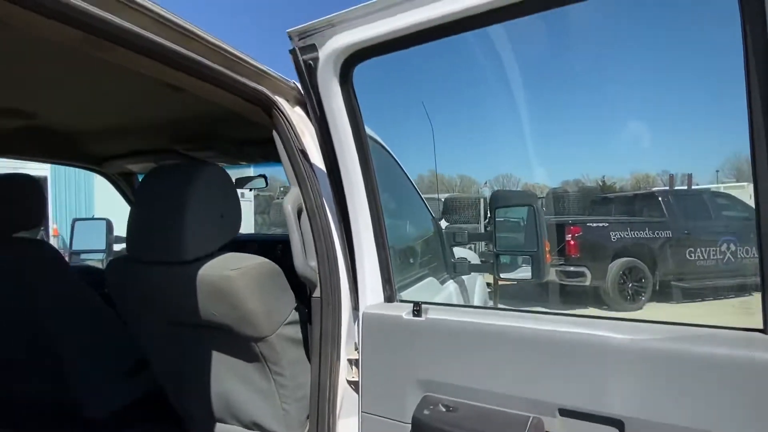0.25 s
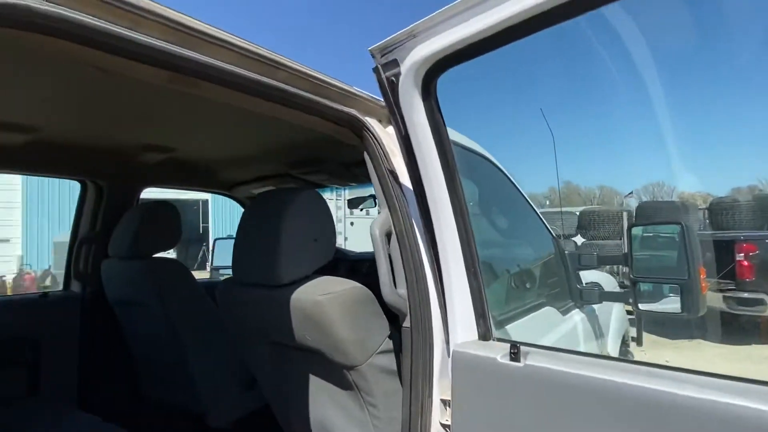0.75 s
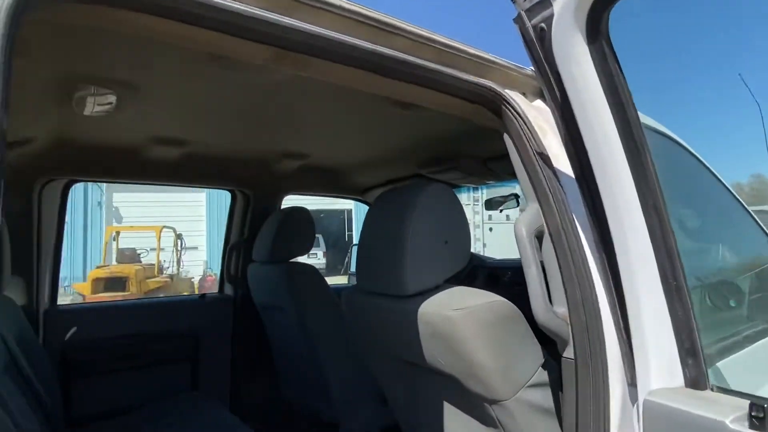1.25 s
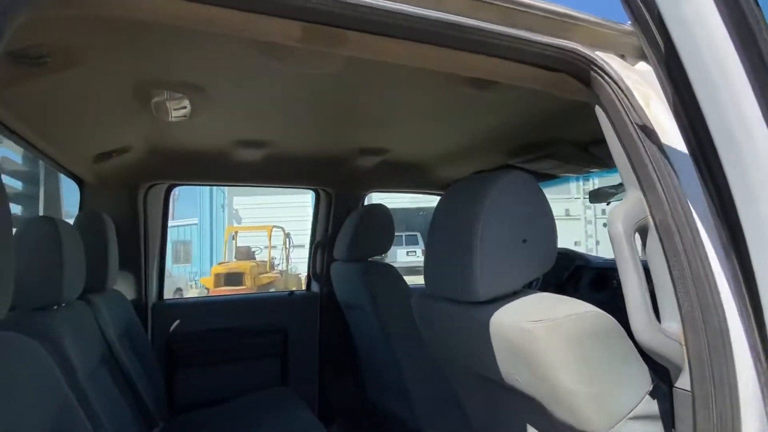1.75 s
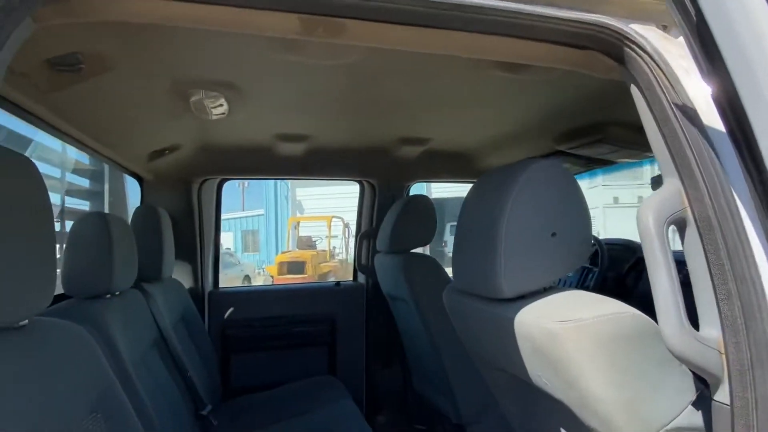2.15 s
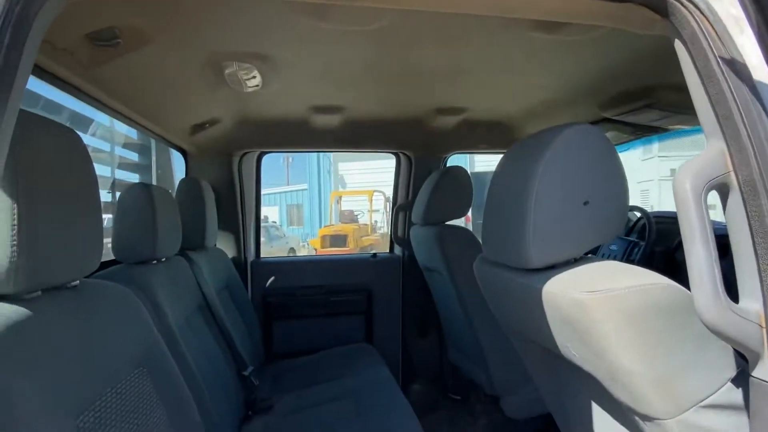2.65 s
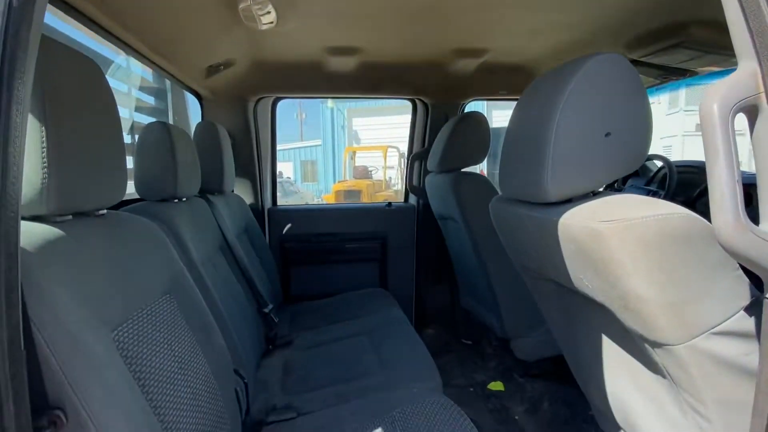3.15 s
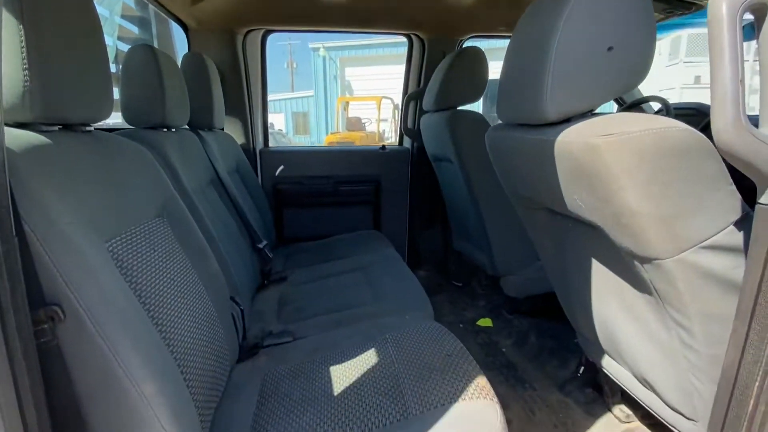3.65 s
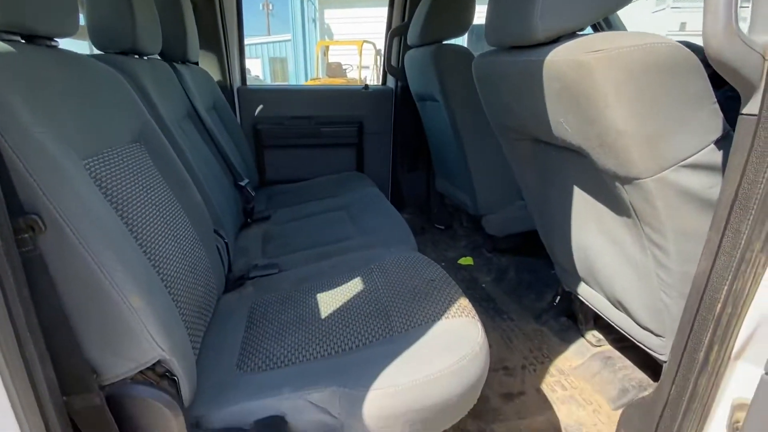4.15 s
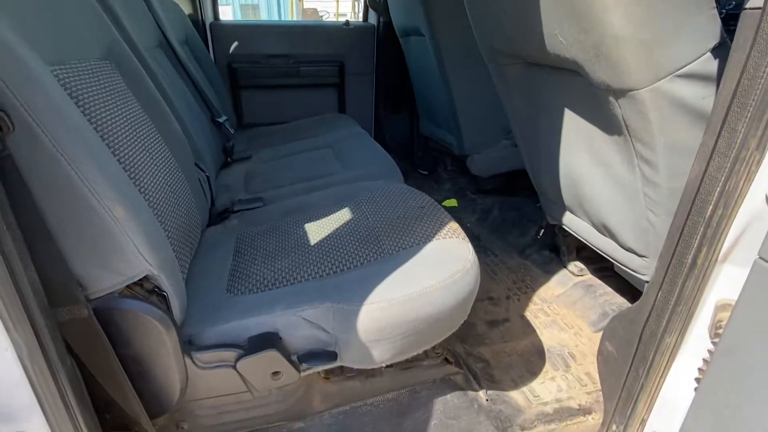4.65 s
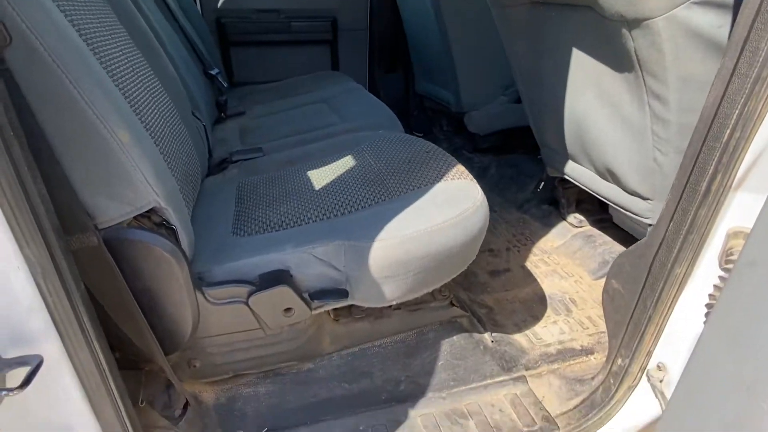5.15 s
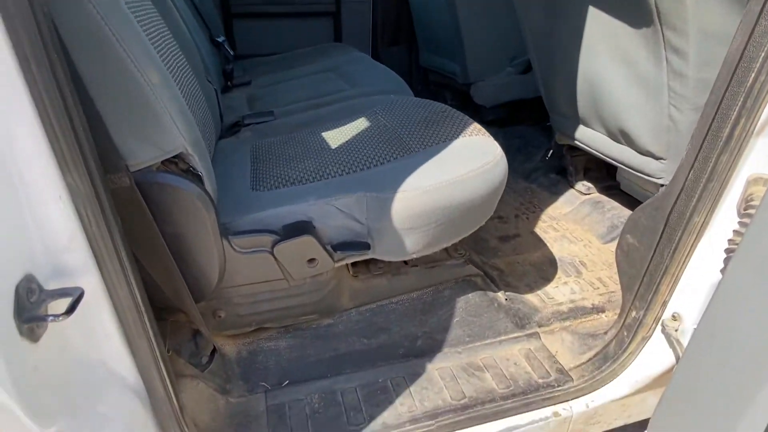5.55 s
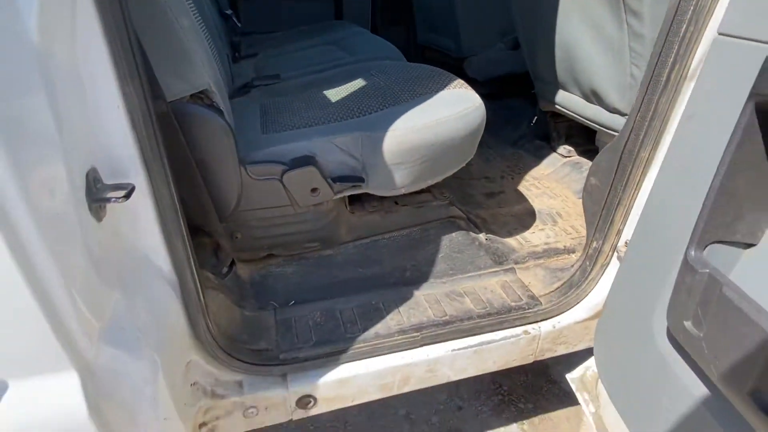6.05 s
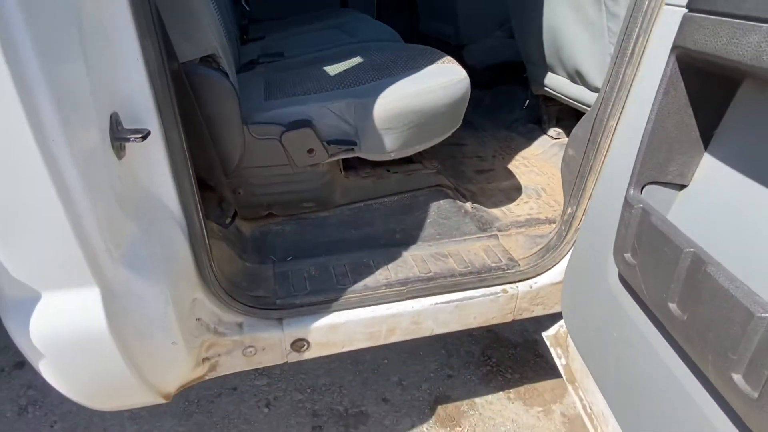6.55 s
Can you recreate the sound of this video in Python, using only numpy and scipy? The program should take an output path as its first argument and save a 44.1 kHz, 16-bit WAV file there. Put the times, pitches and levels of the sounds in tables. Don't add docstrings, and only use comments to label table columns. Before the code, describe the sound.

A six-cylinder diesel pickup idles throughout in an open yard, about forty uneven firings a second blending into a lumpy low hum, with mid-range block rumble and soft injector clatter. A hand-held stereo microphone moves past the open rear door, so the boom swells and thins. From 0 to 2 seconds wind buffets it, with slaps near 1.0 and 1.3 and a heavy thump at 1.6. Faint cloth hiss slides on the right around 1.1-1.8. Stones knock sharply at 1.5, and grit crackles at 1.8-2.0. Small bright ticks come on the left at 2.6 and, softer, 3.45. Hollow fan air sings from about 3 to 5, strongest near 4.1, sinking in pitch. Wind slaps return at 4.5-4.9, hardest at 4.8, with lighter gusts near 5.7. Gritty steps crunch at 5.65 and 6.1, then a heel clacks at 6.5 as the idle continues.

```python
import sys
import numpy as np
from scipy import signal
from scipy.fft import rfft, irfft, next_fast_len
from scipy.io import wavfile
from scipy.ndimage import uniform_filter1d, map_coordinates

SR = 44100
rng = np.random.default_rng(int(sys.argv[2]) if len(sys.argv) > 2 else 0)


def boost(x):
    u = np.asarray(x, float) / 20
    return 10 ** u


def log_audio(samples):
    frames = np.atleast_2d(samples).T
    limited = np.clip(frames, -1, 1)
    pcm = np.round(limited * 32767).astype(np.int16)
    wavfile.write(sys.argv[1], SR, pcm)


N = 300321
TIME = np.arange(N) / SR
PORT_LAG = 22


def curve(table):
    s, *columns = np.transpose(table)
    return [np.interp(TIME, s, c) for c in columns]


def unit(x):
    return x / np.sqrt(np.mean(x ** 2))


def colour(x, points):
    size = next_fast_len(N)
    hz, db = np.transpose(points)
    bins = np.log(np.arange(size // 2 + 1) * SR / size + 1)
    gain = boost(np.interp(bins, np.log(hz), db, -90, -90))
    return unit(irfft(rfft(x, size) * gain, size)[..., :N])


def ring(x, modes):
    out = 0
    for k, (hz, width_hz, db) in enumerate(modes):
        peak = signal.iirpeak(hz, hz / width_hz, SR)
        out = out + (-1) ** k * boost(db) * signal.lfilter(*peak, x)
    return unit(out)


def steep(x, order, hz, kind):
    return signal.sosfiltfilt(signal.butter(order, hz, kind, fs=SR, output="sos"), x)


def walk(rate_hz):
    k = int(SR / rate_hz)
    held = np.repeat(rng.standard_normal(N // k + 1), k)
    return unit(uniform_filter1d(uniform_filter1d(held, k), k)[:N])


def bumps(rows):
    fade_db = 10
    power = 0
    for s, db, width_s in rows:
        power = power + boost(db - fade_db * np.abs(TIME - s) / max(width_s, .01)) ** 2
    return np.sqrt(power)


def pan(x, db, lag=0):
    return np.array([x * boost(db / 2), np.roll(x, lag) * boost(-db / 2)])


def port_gain(db, pan_db):
    return boost(db + np.array([[pan_db], [-pan_db]]) / 2)


def bend(x, share):
    at = np.arange(N) + np.cumsum(share)
    read = [map_coordinates(v, [at], order=1, mode="mirror") for v in np.atleast_2d(x)]
    return np.array(read).reshape(x.shape)


def waver(x):
    drift = walk(7)
    return bend(x, .017 * (drift - drift.mean()))


def spread(points, likeness):
    direct = pan(rng.standard_normal(N), 0, PORT_LAG)
    scattered = rng.standard_normal((2, N))
    return colour(np.sqrt(likeness) * direct + np.sqrt(1 - likeness) * scattered, points)


CYLINDER_DB = [3.5, -2, -18.5, 1.5, 1.5, -13]


def firings():
    firing_hz, jitter, scatter_db, roughness = 41.4, .0322, 1.5, 2.6
    count = int(N / SR * 50)
    timing, strength = rng.standard_normal((2, count))
    at = ((np.arange(count) + jitter * np.cumsum(timing)) * SR / firing_hz).astype(int)
    size = boost(np.resize(CYLINDER_DB, count) + scatter_db * strength)
    inside = (at >= 0) & (at < N)
    pulses = np.zeros(N)
    pulses[at[inside]] = size[inside]
    return pulses, unit(pulses) + roughness * rng.standard_normal(N)


# time in seconds, cab boom in dB, exhaust above it in dB.
BOOM = [(0.0, -31.5, 1), (1.01, -29, -4.5), (1.61, -35, 7), (1.63, -27.5, -7.5), (2.1, -43.5, 4),
        (2.65, -26, -25), (2.69, -35.5, -2), (2.77, -22, -19), (3.13, -27.5, -4), (4.72, -28, -0.5),
        (4.89, -30, -1.5), (4.95, -24.5, -9), (5.03, -26.5, 1), (5.08, -31.5, -10), (5.5, -26, -11.5),
        (6.35, -41, 1.5), (6.71, -27.5, -9.5), (6.81, -31, -16)]
# frequency in Hz, width in Hz, level in dB.
CAB_MODES = [(113.4, 14.5, -3), (165.35, 13.4, -0.5), (205.9, 12, -5.5)]
# frequency in Hz, width in Hz, level in dB.
PIPE_MODES = [(61.9, 19.6, -0.5), (82.7, 9.7, 0), (103.7, 8.7, 3)]


def boom(gas):
    cab_db, pipe_above_db = curve(BOOM)
    pan_db = -3.5 + 4 * walk(8.9)
    cab = ring(ring(gas, CAB_MODES), [(157.5, 116, 0)])
    pipe = ring(ring(gas, PIPE_MODES), [(77.0, 210, 0)])
    return pan(boost(cab_db) * cab, pan_db) + boost(cab_db + pipe_above_db) * pipe


# delay in ms, sway in ms, sway rate in Hz, level in dB.
MIRRORS = [(2.3, .5, .37, -13), (4.1, .7, .53, -11), (7.3, .9, .45, -11), (12.7, 1.2, .71, -12)]


def mirrored(x):
    out = x.copy()
    for k, (ms, sway_ms, rate_hz, db) in enumerate(MIRRORS):
        for port in range(2):
            phase = 2 * np.pi * rate_hz * TIME + 2 * k + port / 8
            lag = (ms + sway_ms * np.sin(phase)) * SR / 1000
            out[port] += boost(db) * map_coordinates(x[port], [np.arange(N) - lag], order=3, mode="mirror")
    return unit(out) * np.sqrt(np.mean(x ** 2))


# time in seconds, block rumble in dB, floor pan above it in dB,
# open-air treble in dB, valve cover above the rumble in dB.
BLOCK = [(0, -44.5, 3.5, 0, 4), (.8, -44.5, 5, 0, 3.5), (1.5, -44.5, -3, 2, -0.5),
         (2.1, -45.5, -6.5, -3, 0.5), (2.6, -45.5, -6.5, -3.5, 1), (3.5, -43.5, -7, -3, -2),
         (4.4, -44, -7.5, -1.8, 0), (5.4, -43.5, 1.5, 0.5, -1.5), (5.75, -43, 8, -0.5, -1.5),
         (6.2, -43, 0.5, 0, 2.5), (6.81, -42.5, 6.5, -0.5, -0.5)]
# frequency in Hz, level in dB.
RUMBLE = [(300, -13), (400, -11), (600, -7.5), (720, -9), (840, -3), (890, -9.5), (960, -2), (1050, -9),
          (1240, -10), (1800, -22), (2600, -55.5)]
# frequency in Hz, level in dB.
CLATTER = [(1500, -8.5), (2450, 1), (3100, -0.5), (4000, -10), (4700, -3), (5300, -8.5), (6300, -8),
           (9000, -13.5), (16000, -10)]
# frequency in Hz, width in Hz, level in dB.
MANIFOLD_MODES = [(958, 23, 1.5), (1238, 52, -6.5), (2460, 63, -20)]


def block(pulses, gas):
    rumble_db, floor_db, treble_db, cover_db = curve(BLOCK)
    floor = ring(gas, [(233.0, 68, -4.0), (287.0, 51.5, 1.5), (321.0, 83, -4.5)])
    floor = pan(ring(floor, [(284, 1300, 0)]) * boost(floor_db + 2.1 * walk(18)), 1.0)
    rumble = spread(RUMBLE, .75) * boost(3 + 1.8 * walk(9))
    cover = steep(rumble, 2, [720, 1480], "band")
    rumble = rumble + (boost(cover_db) - 1) * cover
    clatter = spread(CLATTER, .66) * boost(-4 + .9 * walk(12))
    treble = steep(clatter, 2, 7000, "high")
    clatter = clatter + (boost(treble_db) - 1) * treble
    manifold = waver(ring(gas, MANIFOLD_MODES)) * boost(-14 + 1.3 * walk(5.9))
    decay_s, throb_depth = .004, .06
    swell = signal.lfilter([1], [1, -np.exp(-1 / (decay_s * SR))], pulses)
    throb = unit(1 + throb_depth * unit(swell))
    return boost(rumble_db) * (floor + manifold + throb * mirrored(rumble + clatter))


def engine():
    pulses, gas = firings()
    return boom(gas) + block(pulses, gas)


# time in seconds, buffet peak in dB, width in seconds, flutter above buffet in dB.
WIND = [(.08, -27, 0.089, -24), (.3, -31, .15, -32), (.469, -25.5, 0.067, -11), (.614, -27.5, 0.16, -18),
        (.97, -27, 0.064, -22), (1.03, -29.5, 0.018, -6), (1.27, -19, 0.027, -12), (1.4, -29, 0.17, -26),
        (1.492, -26.5, 0.11, -4.5), (1.58, -9, 0.019, -19), (1.66, -22, 0.013, -7.5),
        (1.731, -26, 0.023, -24), (1.857, -28.5, 0.073, -5), (2.005, -29.5, 0.21, -5.5),
        (2.135, -30, 0.019, 0), (2.215, -43, 0.044, -13), (2.385, -39, 0.046, -8),
        (2.639, -29.5, 0.04, -21), (3.97, -38.5, 0.58, 1.5), (4.225, -23, 0.035, -16), (4.54, -32, 0.16, 2),
        (4.699, -24, 0.12, -7), (4.789, -19.5, 0.077, -10.5), (4.93, -21.5, 0.081, -6),
        (5.637, -27, 0.062, -10), (5.73, -26.5, 0.14, -9), (5.93, -27, 0.017, -8),
        (6.006, -30.5, 0.14, -15), (6.57, -36.5, 0.19, -5)]
# frequency in Hz, level in dB.
BUFFET = [(25, -19.5), (48, 10), (86, 1), (200, -4), (300, -24.5)]
# frequency in Hz, level in dB.
FLUTTER = [(170, 2), (250, -5.5), (450, -12), (600, -36), (900, -15.5), (1500, -46)]
# time in seconds, peak in dB, frequency in Hz, cycles.
SLAPS = [
    (1.025, -15, 110, 1.5),
    (1.265, -14, 120, 1.5),
    (4.535, -18, 130, 1.5),
    (4.778, -9.5, 96, 1.6),
]


def wind():
    left_db, gusty_db, calm_buffet_db, calm_flutter_db = 1.8, 3.5, -53, -49
    big_gusts = [(s, db, width_s) for s, db, width_s, _ in WIND]
    fine_gusts = [(s, db + above_db, width_s) for s, db, width_s, above_db in WIND]
    big = np.hypot(bumps(big_gusts), boost(calm_buffet_db))
    fine = np.hypot(bumps(fine_gusts), boost(calm_flutter_db))
    buffet = colour(rng.standard_normal(N), BUFFET)
    buffet /= np.sqrt(uniform_filter1d(buffet ** 2, size=SR // 16) + 0.069)
    small = 0.5 * rng.standard_normal(N) + 1.23 * rng.standard_normal((2, N))
    flutter = colour(small, FLUTTER) * boost(gusty_db * walk(45))
    eddies = big * buffet + fine * flutter
    for s, db, hz, cycles in SLAPS:
        i, n = int(s * SR), int(cycles / hz * SR)
        swing = np.sin(2 * np.pi * hz * (TIME[:n] - TIME[n // 2]))
        eddies[:, i:i + n] += boost(db) * np.hanning(n) * swing
    return eddies * np.array([[boost(left_db)], [-boost(-left_db)]])


# time in seconds, peak in dB, frequency in Hz, cycles.
PUFFS = [(1.986, -24.5, 460, 4.5), (2.115, -32, 340, 2.5), (4.735, -26, 520, 7), (4.786, -29, 420, 2.5),
         (5.224, -29.5, 540, 6), (5.71, -24.5, 340, 2.5), (5.762, -26, 330, 4), (5.905, -26.5, 420, 3.5),
         (5.928, -26, 310, 4)]


def puffs():
    out = np.zeros(N)
    for s, db, hz, cycles in PUFFS:
        i, n = int(s * SR), int(cycles / hz * SR)
        out[i:i + n] += boost(db) * np.hanning(n) * np.sin(2 * np.pi * hz * TIME[:n])
    return pan(out, 4)


# time in seconds, aim in dB.
DUCT = [(2.3, -60), (2.85, -15), (3.5, -10), (3.68, -6), (3.76, -2.5), (4.1, -.5), (4.36, -1.5), (4.45, -8),
        (5.3, -13), (5.7, -60)]
# frequency in Hz, width in Hz, level in dB.
DUCT_MODES = [(820, 45, -4), (925, 45, 0), (1265, 60, 0), (1600, 100, -9), (2080, 50, -8)]
# frequency in Hz, width in Hz, level in dB.
MOAN_MODES = [(435, 30, 0), (500, 45, -1.5)]
# frequency in Hz, width in Hz, level in dB.
WHISTLE_MODES = [(930, 55, 0), (1250, 70, -7), (1590, 90, -12), (2090, 50, -9)]
# time in seconds, peak in dB, width in seconds.
FLARES = [
    (5.0, -34.5, 0.063),
    (5.25, -42, 0.19),
]


def duct():
    aim_db = curve(DUCT)[0]
    sag = np.clip(.1 * (4.1 - TIME), -.07, .07)
    flutter = boost(1.2 * walk(14))

    moan_gain = np.hypot(boost(-37 + 1.26 * aim_db), bumps(FLARES))
    moan = waver(ring(ring(rng.standard_normal(N), MOAN_MODES), [(437, 300, 0)]))
    moan = pan(moan * moan_gain, 4.6, PORT_LAG // 2)

    air = .9 * pan(rng.standard_normal(N), 0, 25) + .45 * rng.standard_normal((2, N))
    roar = bend(ring(ring(air, DUCT_MODES), [(1200, 3100, 0)]), sag)
    roar = port_gain(0, 3.8) * roar * boost(-44 + aim_db)

    well = ring(rng.standard_normal(N), [(536, 120, 0.012), (652, 90, -2.0)])
    well = pan(ring(well, [(567, 550, 0)]) * boost(-47 + .16 * aim_db), -5.0)

    whistle = ring(ring(rng.standard_normal(N), WHISTLE_MODES), [(1100, 1000, 0)])
    whistle = waver(bend(whistle, sag)) * boost(-43.5 + aim_db)
    return flutter * (moan + roar + well + whistle)


# time in seconds, peak in dB, ring in Hz, left minus right in dB.
KNOCKS = [(1.5015, -31, 1150, 0), (1.5052, -28, 1100, 0), (1.511, -34, 1150, 0), (1.5208, -16, 1250, -1),
          (1.5247, -27, 1100, -1), (1.536, -26, 1300, -1), (1.5495, -33, 1150, 0), (1.555, -34, 1150, 0),
          (1.5625, -32, 1450, -1), (1.5661, -23.5, 1250, -2), (1.5663, -35, 1700, 0), (1.571, -33, 1050, 0),
          (1.5055, -32, 2050, 0), (1.87, -38, 1150, 0), (1.5362, -31, 900, 0), (1.835, -38, 1100, 0),
          (1.941, -38, 1000, 0), (6.5262, -35, 3300, 1), (6.1162, -32, 2000, 0), (6.1165, -34, 1300, 0),
          (6.1305, -35, 1250, 0)]
# time in seconds, peak in dB, ring in Hz, left minus right in dB.
SNAPS = [(1.8646, -39, 4400, 0), (1.9832, -44, 3100, -2), (1.984, -44, 5900, 0), (2.0224, -44, 3100, 1),
         (2.1457, -42, 4100, -2), (3.6818, -36, 2310, 0), (6.492, -42, 1800, 0), (6.506, -36, 3570, 2),
         (1.8686, -39, 7500, -2), (1.8648, -40, 8500, 0), (1.8215, -45, 4200, 1), (1.9835, -44, 8200, -3),
         (1.809, -45, 8000, 0), (6.4925, -45, 4000, 0), (6.507, -42, 6500, 0), (1.621, -44, 3600, 0),
         (2.073, -46, 1900, 0), (2.123, -46, 7500, 0)]
# time in seconds, peak in dB, centre in Hz, left minus right in dB.
CHIPS = [(1.8868, -36, 8400, -3), (1.8868, -36, 1800, 0), (1.9115, -38, 4400, 0), (1.922, -33, 1300, 0),
         (1.9295, -32, 1200, 0), (5.6545, -36, 4400, -3), (5.6552, -33, 1800, 0), (5.6655, -37, 3500, 0),
         (5.6692, -29, 1700, 3), (5.6696, -29, 4300, 0), (5.6752, -32, 3400, 2), (5.6778, -29, 2000, 2),
         (5.6812, -34, 5800, 0), (6.022, -33, 2000, -2), (6.0235, -39, 9000, 0), (6.1225, -33, 2200, 0),
         (6.1275, -33, 1700, 0), (6.5235, -30, 2600, 0), (1.8865, -32, 2600, 0), (5.6693, -28, 2900, 2)]
# time in seconds, peak in dB, ring in Hz, left minus right in dB.
CLACK = (6.5234, -20, 1200, 0)
# time in seconds, peak in dB, ring in Hz, left minus right in dB.
PINGS = [(1.5365, -33, 2560, 0), (1.5655, -35, 2640, -2), (1.5665, -37, 2200, 0), (1.523, -38, 2550, 0),
         (1.5805, -40, 2520, 0), (1.8355, -43, 2620, 0), (1.8585, -41, 2600, 0), (1.869, -36, 2560, 0),
         (1.8868, -32, 2536, 0), (1.888, -39, 5100, 0), (1.8872, -38, 1750, 0), (1.8872, -42, 8330, -2),
         (1.9025, -40, 2480, 0), (1.9095, -41, 2450, 0), (1.929, -39, 2550, 0), (5.6692, -34, 2500, 3),
         (5.6775, -34, 2880, 2), (5.6775, -35, 4600, 2), (5.6765, -39, 6100, 0), (5.6545, -40, 5500, 0),
         (5.67, -39, 5500, 0), (5.6825, -38, 2600, 0), (6.5232, -32, 3450, 1), (6.5232, -35, 4250, 1),
         (6.5265, -36, 1400, 0), (6.5095, -39, 3700, 1), (6.5055, -39, 1800, 0), (6.515, -41, 3400, 0),
         (6.531, -39, 3500, 0), (6.5375, -40, 3200, 0), (6.543, -42, 3150, 0), (6.1215, -42, 5900, 0),
         (6.1315, -44, 5900, 0), (6.119, -36, 2100, 0)]


def pebbles():
    tail_db, tail_s, crack_s = -12, .004, .0005
    upper_ratio, upper_db = 2.1, -28
    echo_db, echo_s = -18, .008
    # stones, crack dB, ring T60 s
    kinds = [(KNOCKS, -27, .008), (SNAPS, 1.5, .008), (CHIPS, -6, .002), ([CLACK], -17, .003),
             (PINGS, -14, .026)]
    stones = [(*row, crack_db, t60_s) for rows, crack_db, t60_s in kinds for row in rows]
    out, t = np.zeros((2, N)), TIME[:2000]
    for s, db, hz, pan_db, crack_db, t60_s in stones:
        chance = rng.standard_normal((4, len(t)))
        noise = signal.lfilter(*signal.butter(1, 1700, "high", fs=SR), chance[:2])
        modes = np.sin(2 * np.pi * hz * t) + boost(upper_db) * np.sin(2 * np.pi * upper_ratio * hz * t)
        body = modes * (1 - np.exp(-2 * hz * t)) * np.exp(-np.log(1000) * t / t60_s)
        echo = unit(signal.lfilter(*signal.iirpeak(hz, 2.2, SR), chance[2:])) * np.exp(-t / echo_s)
        crack = noise[0] * np.exp(-t / crack_s) + boost(tail_db) * noise * np.exp(-t / tail_s)
        heard = body / body.max() + boost(echo_db) * echo + boost(crack_db) * crack
        i = int(s * SR)
        out[:, i:i + len(t)] += port_gain(db, pan_db) * heard
    return out


# start in seconds, length in seconds, level in dB, centre in Hz,
# left minus right in dB.
SCUFFS = [(0.28, 0.33, -52.5, 5000, 1), (0.5, 0.04, -47, 5000, 3), (1.083, 0.044, -54, 5000, 0),
          (1.497, 0.082, -41, 1100, -3), (1.787, 0.17, -49, 4940, -1), (1.893, 0.058, -44.5, 3800, -1),
          (1.973, 0.018, -47.5, 6500, -3), (1.916, 0.044, -41.5, 1000, -5), (3.301, 0.05, -53.5, 3970, 6),
          (5.649, 0.046, -41.5, 4000, -1), (5.656, 0.018, -54, 5000, -1), (6.107, 0.022, -46, 7500, -4),
          (6.476, 0.032, -43, 10000, -5), (5.671, 0.04, -48, 1590, -11), (5.907, 0.032, -47.5, 2480, -5),
          (6.113, 0.041, -44.5, 1470, -7), (6.475, 0.09, -44.5, 4000, -2), (6.508, 0.036, -42.5, 3000, 0)]


def scuffs():
    grains_per_s, spread_db, smear = 900, 5, .35
    out = np.zeros((2, N))
    for s, length_s, db, hz, pan_db in SCUFFS:
        i, n = int(s * SR), int(length_s * SR)
        chance = rng.random((4, SR // 3))[:, :n]
        size = boost(np.minimum(-spread_db * np.log(chance[1]), 9.5))
        grit = (chance[0] < grains_per_s / SR) * size * np.sign(chance[2] - .5)
        band = signal.butter(2, [hz / 2, min(hz * 2, 20000)], "band", fs=SR)
        grit = signal.lfilter(*band, grit + 4 * smear * (chance[2:] - .5))
        out[:, i:i + n] += port_gain(db, pan_db) * unit(grit) * np.sqrt(np.hanning(n))
    return out


# time in seconds, peak at the left port in
# dB.
TICKS = [
    (2.59672, -16),
    (3.4542, -18),
]
# frequency in Hz, level in dB, decay in seconds.
TICK_PARTS = [(2700, -9, .0004), (12300, -16, .00012)]


def ticks():
    rise_s, ring_s, sag = .0003, .00055, .1
    ring_db, edge_db, right_db = -5, -11, -5
    out, lead = np.zeros((2, N)), 100
    t = TIME[:400] - TIME[lead]
    impulse = signal.unit_impulse(len(t), lead)
    edge = signal.filtfilt(*signal.butter(2, [1300, 15300], "band", fs=SR), impulse)
    edge = signal.lfilter(*signal.butter(1, 7000, fs=SR), edge)
    swell = np.exp(np.minimum(t / rise_s, -t / ring_s))
    for port, hz in enumerate((4700, 4000)):
        shell = swell * np.cos(2 * np.pi * hz * t * (1 - sag * np.tanh(t / ring_s)))
        tick = boost(ring_db) * shell + boost(edge_db) * edge / edge.max()
        for part_hz, db, decay_s in TICK_PARTS:
            tick += boost(db) * np.exp(-np.abs(t) / decay_s) * np.cos(2 * np.pi * part_hz * t)
        for s, db in TICKS:
            i = int(s * SR) - lead + port * PORT_LAG
            out[port, i:i + len(t)] += boost(db + port * right_db) * tick
    return out


# time in seconds, level in dB.
CLOTH = [(1.0, -79), (1.12, -67), (1.22, -69), (1.35, -64), (1.5, -62), (1.64, -65), (1.8, -76), (1.9, -95)]


def cloth():
    hiss = ring(rng.standard_normal(N), [(4760, 420, 3), (8570, 1000, 7.3)])
    return pan(hiss * boost(curve(CLOTH)[0] + 1.5 * walk(21)), -17)


def scene():
    return engine() + wind() + puffs() + duct() + pebbles() + scuffs() + cloth()


def roll_off(x):
    return signal.sosfilt(signal.butter(12, 16390, fs=SR, output="sos"), x)


# frequency in Hz, microphone in dB, left minus right in dB.
PORTS = [(2040, 1, 0.5), (5000, -1, 3), (6930, -3.5, 4), (7600, -9.5, -4.5), (9300, -4.5, -5.5),
         (11260, -14.5, -2.5), (12000, -31.5, -4.5), (14640, -8.5, 1), (15400, -44, -9.5),
         (16500, -58.5, -4)]


def record(dry):
    size = next_fast_len(N)
    hz, port_db, lean_db = np.transpose(PORTS)
    bins = np.log(np.arange(size // 2 + 1) * SR / size + 1)
    gain = [boost(np.interp(bins, np.log(hz), port_db + side * lean_db / 2)) for side in (1, -1)]
    heard = irfft(rfft(dry, size) * gain, size)[:, :N] + ticks()
    mix = signal.sosfilt(signal.butter(2, 41, "high", fs=SR, output="sos"), heard)
    return roll_off(mix)


dry = scene()
out = record(dry)
log_audio(out)
```